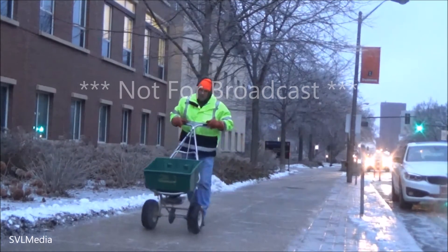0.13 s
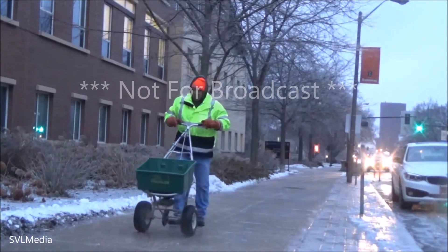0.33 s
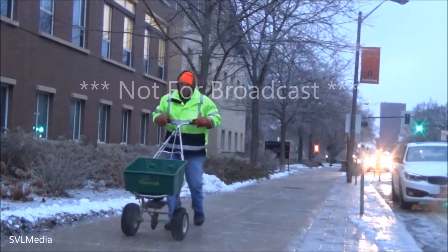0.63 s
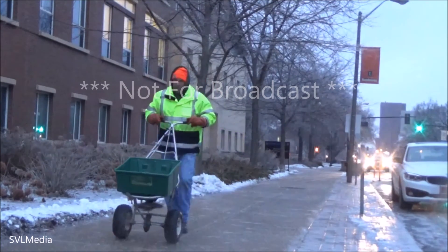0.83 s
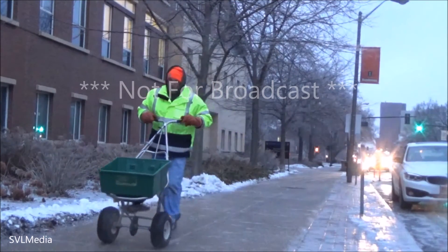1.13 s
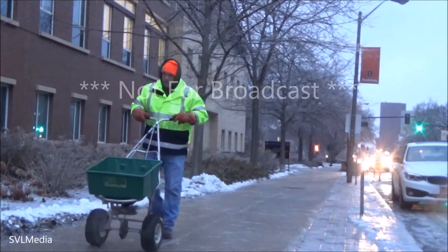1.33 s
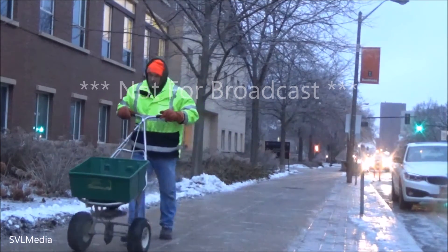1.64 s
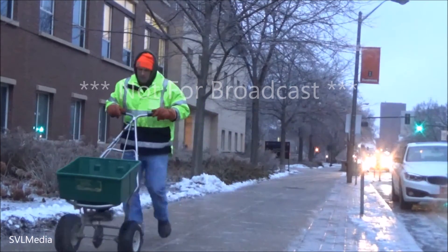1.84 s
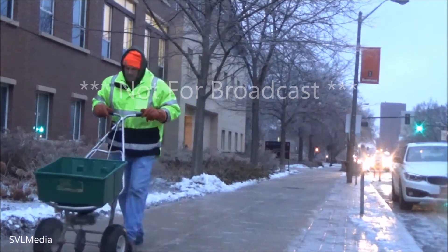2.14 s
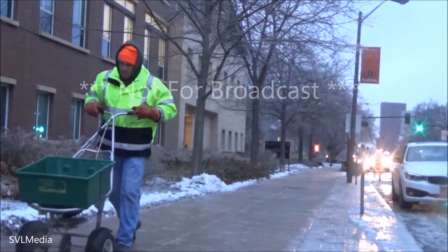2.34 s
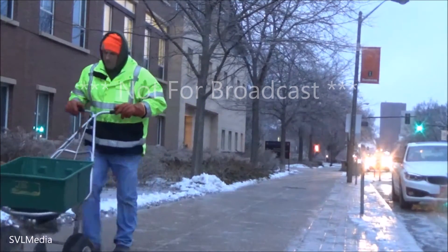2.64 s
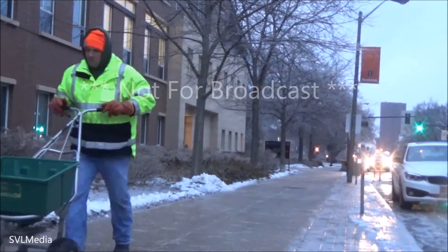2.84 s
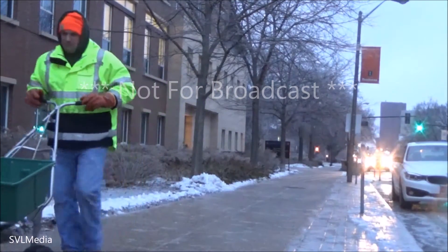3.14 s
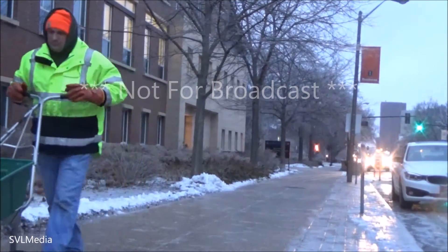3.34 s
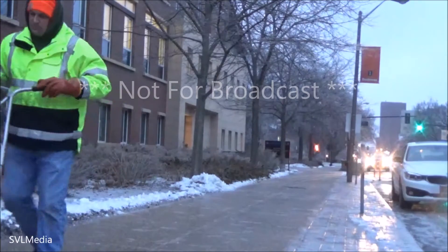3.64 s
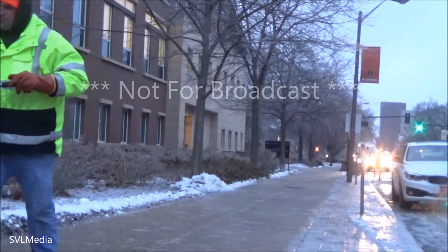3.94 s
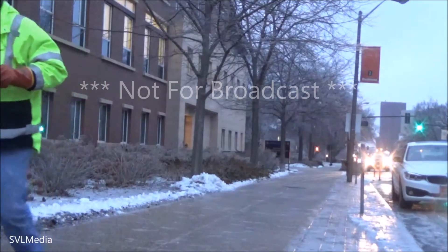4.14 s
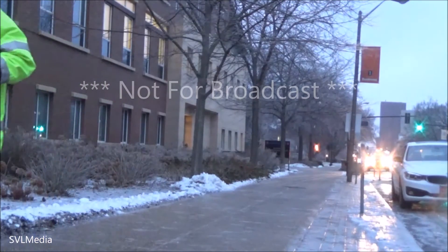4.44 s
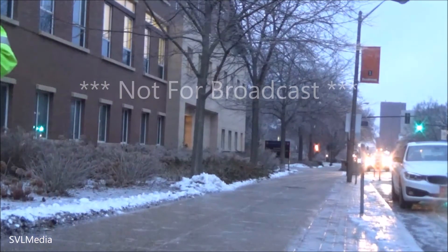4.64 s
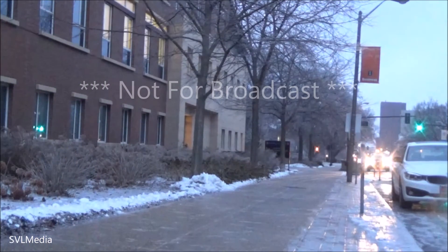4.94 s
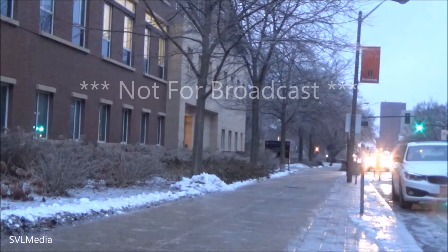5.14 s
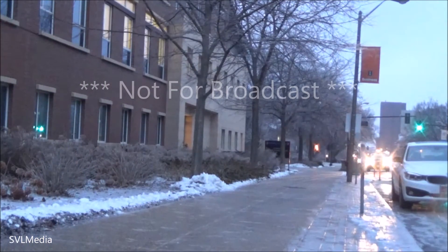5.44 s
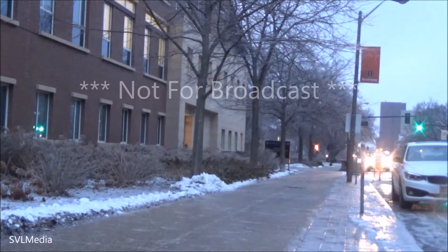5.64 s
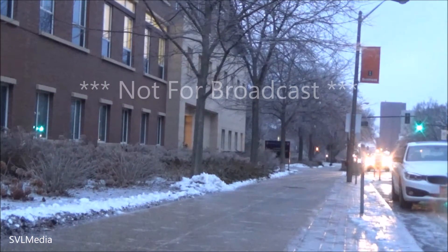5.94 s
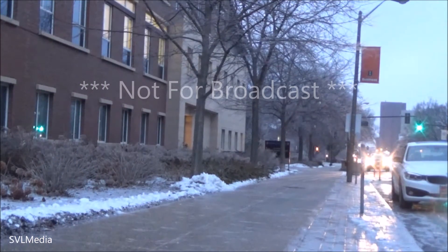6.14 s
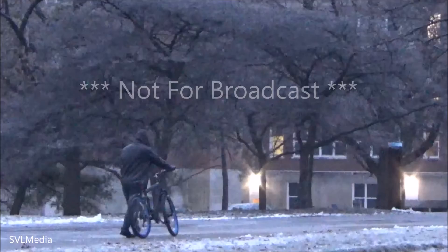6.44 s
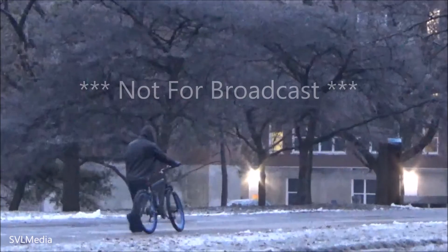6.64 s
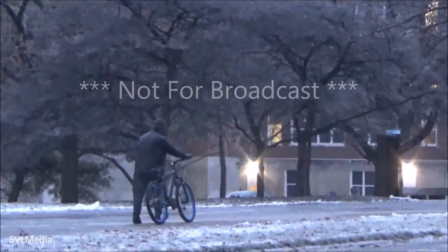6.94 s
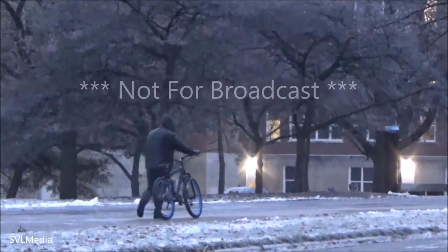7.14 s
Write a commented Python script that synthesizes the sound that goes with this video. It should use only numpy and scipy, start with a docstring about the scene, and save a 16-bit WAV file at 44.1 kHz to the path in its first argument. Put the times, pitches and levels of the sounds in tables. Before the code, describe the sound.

Rock salt sprays and patters from a pushed spreader, passing close on the left in buffeting wind, cuts off, then a quieter spot with icy clicks.

```python
"""On an icy sidewalk a walk-behind spreader flings rock salt, comes close and passes on the left.
Grains patter as random impacts in uneven throws, over a hiss; coarse crystals crack as brief damped cycles.
The spinner rings through narrow resonances; filtered noise makes the buffeting wind and the far traffic.
The sound cuts off; after a short silence a quieter spot follows: wind, clicks of ice, two light clacks."""
import sys
import numpy as np
from scipy import signal
from scipy.fft import rfft, irfft
from scipy.io import wavfile
from scipy.ndimage import uniform_filter1d

SR = 44100
rng = np.random.default_rng(int(sys.argv[2]) if len(sys.argv) > 2 else 0)


def wrap_up_sound(samples):
    """Save the sound to the file named by the first command line argument, as 16-bit audio."""
    columns = np.atleast_2d(samples).T
    # keep every value between -1 and 1, then stretch to whole-number steps
    tamed = np.clip(columns, -1, 1)
    steps = np.round(tamed * 32767).astype(np.int16)
    wavfile.write(sys.argv[1], SR, steps)


N = 320780
T = np.arange(N) / SR  # time in s
CUT_S, RESUME_S = 6.333, 6.476  # end of the first place, start of the quiet spot


def gain_of(db):
    """Level law: decibels to amplitude ratio."""
    return 10 ** (np.asarray(db) / 20)


def evened(x):
    """Normalisation: equal mean power, rms 1."""
    return x / np.sqrt(np.mean(x ** 2) + 1e-20)


def read(points, hz):
    """Spectral interpolation: values lie on a logarithmic frequency axis."""
    f, value = np.transpose(points)
    return np.interp(np.log(hz + 1), np.log(abs(f) + 1), value)


def curve(rows, t):
    """Linear interpolation: a course in time is read at the times t."""
    return np.interp(t, *np.transpose(rows))


def add(mix, s, sound):
    """Superposition: a stereo sound joins the mix at time s."""
    part = mix[:, max(round(s * SR), 0):][:, :sound.shape[1]]
    part += sound[:, :part.shape[1]]


def coloured(x, points):
    """Linear filtering: the spectrum is multiplied by a magnitude response."""
    hz = np.fft.rfftfreq(x.shape[-1], 1 / SR)
    return irfft(rfft(x) * gain_of(read(points, hz)), x.shape[-1])


def wander(hz):
    """Low-pass random process: slow chance of rms 1, up to about hz changes a second."""
    slow = T[::32]
    f = np.fft.rfftfreq(len(slow), slow[1])
    noise = rfft(rng.standard_normal(len(slow)))
    return np.interp(T, slow, evened(irfft(noise / (1 + (f / hz) ** 2), len(slow))))


def pair(z, same):
    """Interaural correlation: two unrelated fields become left and right with a given likeness."""
    same = np.clip(same, -.99, .99)
    mid, side = np.sqrt(1 + same) * z[0], np.sqrt(1 - same) * z[1]
    return np.array([mid + side, mid - side])


def leaning(lean_db):
    """Level difference: gains of left and right, lean_db apart."""
    return gain_of(np.array([[lean_db], [-lean_db]]) / 2)


def tick(hz, cycles, size=512):
    """Damped oscillation: quickly dying cycles, strongest after the given number of them."""
    t = np.arange(size) / SR
    u = t * hz / cycles
    return u * np.exp(1 - u) * np.sin(2 * np.pi * (hz * t + rng.random()))


def splinter(decay_s, size=512):
    """Brittle fracture: a tiny noise burst that covers all pitches at once."""
    return rng.standard_normal(size) * np.exp(-np.arange(size) / SR / decay_s)


def ringing(x, hz, width_hz):
    """Resonance: a doubled pole gives steep flanks."""
    pole = np.exp((2j * np.pi * hz - np.pi * abs(width_hz)) / SR)
    return signal.lfilter([1], np.poly([pole, pole]), x).real


# Relative spectrum of distant traffic and open air: f/Hz, density/dB per Hz
STREET = [(15, -5), (31, -14.5), (45, -4), (75, -7), (180, -28.5), (400, -18), (800, -20.5), (1500, -29.5),
          (3500, -34), (7500, -38.5), (10500, -37)]
# Idling engines: f/Hz, mean level/dB
ENGINES = [(31, -48.5), (91.5, -51.5), (264, -47.5)]


def street(air_db, quiet_spot_db):
    """Broadband and tonal superposition: far traffic and, at the first place, wavering idle drones."""
    air = gain_of(air_db) * evened(coloured(pair(rng.standard_normal((2, N)), same=0.53), STREET))
    drone = np.zeros(N)
    for hz, db in ENGINES:
        phase = 2 * np.pi * np.cumsum(hz + 1.29 * wander(hz=6.8)) / SR
        drone += gain_of(db + 4.0 * wander(hz=15.0)) * np.sin(phase)
    return np.where(T < CUT_S, air + drone, gain_of(quiet_spot_db) * air)


# Light breeze between the gusts: t/s, level/dB
BREEZE = [(0, -23.5), (0.45, -24.5), (1.12, -25.5), (1.24, -30.5), (1.9, -31.5), (2.2, -39), (2.9, -32),
          (4.7, -32.5), (6.2, -29), (6.72, -28), (7.15, -37.5)]
# Gusts on the microphone: start t/s, length/s, level/dB, tilt toward higher eddies/dB per octave
GUSTS = [(0.0, 0.086, -24.5, 4.5), (0.111, 0.058, -24.5, 10.5), (0.621, 0.062, -21, 6),
         (0.701, 0.033, -21.5, 3.5), (0.77, 0.13, -22.5, 4.5), (0.933, 0.055, -22.5, 2),
         (1.024, 0.054, -20.5, 2.5), (1.387, 0.028, -25.5, -3.5), (1.63, 0.21, -35, -7.5),
         (2.553, 0.25, -35, 3), (2.944, 0.016, -22, -0.5), (3.095, 0.054, -27, 2.5), (3.17, 0.14, -31.5, 1),
         (3.504, 0.04, -25.5, 0.5), (3.63, 0.023, -30, -4), (3.817, 0.027, -27.5, 0),
         (4.019, 0.13, -26.5, 1), (4.273, 0.019, -24, 5.5), (4.327, 0.1, -26.5, 6),
         (4.417, 0.04, -21, -0.5), (4.526, 0.03, -27, 1), (4.852, 0.11, -26, 5.5),
         (4.971, 0.016, -23.5, -7), (5.051, 0.026, -25.5, 3.5), (5.103, 0.031, -22, 4),
         (5.244, 0.032, -24.5, -1), (5.6, 0.067, -27, 5.5), (5.736, 0.047, -24.5, 3.5),
         (5.91, 0.028, -23, 1), (5.943, 0.094, -27.5, -3), (6.096, 0.066, -22, -0.5),
         (6.471, 0.045, -24, 2), (6.539, 0.029, -19, -1), (6.683, 0.037, -26, -8), (6.776, 0.05, -26, 1.5),
         (6.818, 0.054, -20.5, -2), (6.881, 0.049, -23, 3), (6.932, 0.045, -23, -1.5),
         (7.054, 0.019, -27.5, 1.5), (7.234, 0.02, -24, -3)]
GUST_RISE_S, GUST_FALL_S = 0.0098, 0.022


def wind_strength():
    """Power addition: gusts rise, hold and fall on the breeze; level (dB), tilt (dB per octave)."""
    power, tilted = gain_of(curve(BREEZE, T)) ** 2, np.zeros(N)
    for start, length, db, tilt in GUSTS:
        end = start + length
        shape = np.interp(T, [start - GUST_RISE_S, start, end, end + GUST_FALL_S], [0, 1, 1, 0])
        gust = (gain_of(db) * shape) ** 2
        power, tilted = power + gust, tilted + tilt * gust
    return 10 * np.log10(power), tilted / power


# Relative spectrum of the buffeting before its tilt: f/Hz, density/dB per Hz
BUFFET = [(20, -1), (43, -14.5), (75, 2), (129, 0), (244, -3.5), (340, -7.5), (460, -12.5), (700, -18.5),
          (1000, -27), (1600, -37.5), (3000, -71.5)]
# Left-right correlation of the wind: f/Hz, likeness (-1 to 1)
SAME_WIND = [(60, 0.94), (130, 0.51), (260, -0.015), (560, -0.31), (1200, -0.12)]


def wind(breeze_tilt_db, lump_db):
    """Turbulent pressure: eddies buffet each port in lumps; quicker eddies reach higher in pitch."""
    level_db, tilt_db = wind_strength()
    hz, t, z = signal.stft(rng.standard_normal((2, N)), SR, nperseg=1024)
    octaves = np.log2(np.clip(hz, 70, 450) / 150)[:, None]
    tilt = np.interp(t, T, tilt_db) + breeze_tilt_db
    colour = gain_of(read(BUFFET, hz)[:, None] + octaves * tilt)
    # each moment's colour has unit power, so that level_db alone sets the strength
    z = pair(z, read(SAME_WIND, hz)[:, None]) * colour / np.linalg.norm(colour, axis=0)
    lumps = gain_of(lump_db * np.tanh(wander(hz=45.0)))
    return evened(signal.istft(z, SR, nperseg=1024)[1][:, :N] * lumps) * gain_of(level_db)


# Single eddies that thump the microphone: t/s, peak level before the mix gain/dB, f/Hz
THUMPS = [(0.011, -9, 108), (0.16, -8, 170), (1.264, -17, 146), (1.406, -17, 137), (2.965, -15, 134),
          (3.536, -10, 145), (5.112, -22, 260), (6.486, -5, 218), (6.562, -9, 154), (6.656, -10, 168),
          (6.834, -10.5, 126), (7.059, -19, 170)]


def thumps(cycles, stray):
    """Pressure transient: a single eddy shoves both ports, each a little differently."""
    out = np.zeros((2, N))
    for s, db, hz in THUMPS:
        shove = tick(hz, cycles, size=3000)
        own = stray * tick(hz, cycles, size=3000)
        add(out, s - cycles / hz, gain_of(db) * np.array([shove + own, shove - own]))
    return out


# Clicks of ice at the quiet spot: t/s, level before the envelope/dB, 60 dB decay time/s
ICE = [(6.505, -28, 0.021), (6.796, -24, .01), (7.0962, -14.5, 0.0089), (7.1046, -21.5, 0.0081)]
# Relative response of the ice: f/Hz, level/dB
ICE_COLOUR = [(1200, -12), (2200, -6), (4500, -8), (7000, -1), (8800, -3), (10500, 0.5)]


def ice():
    """Exponential decay: brittle ice gives a few short, bright clicks."""
    out, t = np.zeros((2, N)), np.arange(4096) / SR
    for s, db, t60 in ICE:
        burst = evened(coloured(pair(rng.standard_normal((2, len(t))), same=0.6), ICE_COLOUR))
        attack = 1 - np.exp(-12 * t / t60)
        add(out, s, burst * gain_of(db - 60 * t / t60) * attack)
    return out


# Light metallic clacks at the quiet spot: t/s, peak level before the lean/dB
CLACKS = [(6.806, -27), (7.153, -29.5)]
# Resonances of the loose part: f/Hz, width/Hz, relative level/dB
CLACK_MODES = [(2390, 110, -2.5), (2980, 1200, 1.5), (4550, 850, -1.5), (5700, 680, -0.5), (9000, 670, -2),
               (9900, 1200, -7.5)]


def clacks(rattle_s, lean_db):
    """Modal excitation: a loose part, likely on a bicycle wheeled past, rattles briefly and rings."""
    out, t = np.zeros((2, N)), np.arange(4096) / SR
    for s, db in CLACKS:
        envelope = t / rattle_s * np.exp(-t / rattle_s)
        rattle = pair(rng.standard_normal((2, len(t))), same=0.6) * envelope
        ring = sum(gain_of(mode_db) * evened(ringing(rattle, hz, width))
                   for hz, width, mode_db in CLACK_MODES)
        add(out, s, gain_of(db) * ring / abs(ring).max())
    return out * leaning(lean_db)


# Boots and wheels crunching over salt and ice:
# t/s, level before the envelope/dB, f/Hz, length/s, width as a share of f
CRUNCHES = [(1.254, -31, 1250, 0.053, .8), (1.647, -30.5, 2350, 0.082, 0.61),
            (2.886, -23, 1790, 0.011, 0.73), (5.127, -29, 555, 0.048, 0.78),
            (5.173, -28.5, 1330, 0.041, 0.32), (5.189, -36, 1260, 0.025, .35)]


def crunches(grains_per_s):
    """Random impulse train: crushed grains crackle dully in a cluster that starts quickly and fades."""
    out = np.zeros((2, N))
    for s, db, hz, length, width in CRUNCHES:
        u = np.linspace(0, 1, int(length * SR))
        breaking = rng.random(len(u)) < grains_per_s / SR
        crackle = rng.standard_normal((2, len(u))) * breaking
        rasp = evened(ringing(pair(crackle, same=0.7), hz, width * hz))
        add(out, s, gain_of(db) * rasp * np.sin(np.pi * np.sqrt(u)))
    return out


# Hard grains snapping on the pavement close by: t/s, peak level before the side gains/dB
SNAPS = [(0.063, -9), (0.2428, -5.5), (0.3796, -9), (0.4112, -6), (0.4501, -13), (0.5477, -6),
         (0.6854, -11), (0.8285, -10), (0.909, -4), (1.0867, -8), (1.1339, -6), (1.2693, -12),
         (1.2777, -16), (1.2995, -25), (1.721, -2), (1.8458, -14), (2.1976, -19), (2.2317, -6),
         (2.726, -15), (3.79, -19), (3.8772, -7), (3.9669, -13), (4.5944, -15), (4.6867, -8), (5.7004, -17),
         (5.9996, -11)]
# Relative response of a snap: f/Hz, level/dB
SNAP_COLOUR = [(1200, -24), (3500, -12), (5500, -2.5), (9500, 2), (11000, -7), (13000, -40)]


def snaps(decay_s, spread):
    """Amplitude panning: a hard grain shatters brightly, a little to one side or the other."""
    out = np.zeros((2, N))
    for s, db in SNAPS:
        snap = coloured(np.pad(splinter(decay_s), 64), SNAP_COLOUR)
        side = spread * rng.uniform(-1, 1)
        sound = np.outer([1 + side, 1 - side], snap / abs(snap).max())
        add(out, s - abs(snap).argmax() / SR, gain_of(db) * sound)
    return out


# The spreader's approach and passing: t/s, level of the salt/dB
SPRAY = [(0, -27), (1.05, -24), (1.5, -23.5), (1.9, -22.5), (2.22, -20), (2.38, -21), (3.05, -20.5),
         (3.88, -21.5), (4.02, -22), (5.65, -24), (6.3, -24)]
# When it is ahead, close, still close, passed, leaving, behind: t/s
PLACES_S = [.7, 2.1, 3.6, 4.8, 5.4, 6.1]
# Smaller crystals: rate, level above the salt's, and pitch; each spread is to either side
LESSER_PER_S, LESSER_DB, LESSER_SPREAD_DB = 5, 1, 1.5
LESSER_HZ, LESSER_OCTAVES, LESSER_CYCLES = 2250, 0.62, 0.67


def lesser_cracks(count=30):
    """Poisson process: smaller crystals land until it has passed, following the salt's level."""
    gap, size, pitch = rng.random((count, 3)).T
    times = np.cumsum(-np.log(gap)) / LESSER_PER_S
    levels = curve(SPRAY, times) + LESSER_DB + LESSER_SPREAD_DB * (2 * size - 1)
    pitches = LESSER_HZ * 2 ** (LESSER_OCTAVES * (2 * pitch - 1))
    return [(s, db, hz, LESSER_CYCLES) for s, db, hz in zip(times, levels, pitches) if s < PLACES_S[3]]


# The loudest coarse crystals cracking on the spreader and the ice:
# t/s, peak level before colour and lean/dB, f/Hz, ring/cycles
CRACKS = [(0.0903, -10, 3150, 0.38), (0.0974, -8.5, 3100, 0.24), (0.243, -17.5, 2520, 0.62),
          (0.411, -14, 2870, .5), (0.528, -15.5, 2700, 0.55), (0.7638, -9.5, 2180, 0.46),
          (1.047, -6.5, 2780, 0.25), (1.2581, -7.5, 1600, 0.29), (1.2598, -18, 660, 0.4),
          (1.2687, -17, 1110, 0.34), (1.2753, -11, 2100, 0.29), (1.349, -14.5, 1880, 0.41),
          (1.3925, -17, 2800, 0.45), (1.481, -17.5, 2200, 0.5), (1.5795, -19, 2400, 0.46),
          (1.655, -13.5, 2250, 0.45), (1.6605, -12.5, 1714, 0.23), (1.6663, -8, 2050, 0.48),
          (1.6684, -10, 4400, 0.67), (1.687, -18, 1910, 0.27), (1.688, -10, 2850, 1),
          (1.7078, -15, 2600, 0.45), (2.054, -12, 1800, 0.4), (2.1504, -14, 1980, 0.34),
          (2.16, -5.5, 2300, 0.41), (2.194, -14.5, 2660, 0.67), (2.3, -9, 1740, 0.29),
          (2.4228, -8, 1900, 0.37), (2.5047, -8, 2900, 0.98), (2.5984, -8, 2770, 0.54),
          (2.843, -17, 1950, 0.49), (2.892, -17, 2200, 0.45), (3.112, -10, 2790, 0.65),
          (3.2352, -9.5, 2900, 0.5), (3.254, -12.5, 2100, 0.38), (3.2814, -10, 2800, 0.6),
          (3.3162, -6.5, 2900, 0.39), (3.6405, -8, 2240, 0.41), (3.6897, -14, 1980, 0.53),
          (4.13, -18, 3350, 1), (4.17, -9, 2500, 0.24), (4.321, -10.5, 3300, 0.63),
          (4.3453, -12.5, 1790, 0.56), (5.126, -15, 1850, 0.69), (5.1837, -16, 1346, 0.7)]
# Relative response of the cracks: f/Hz, level/dB
CRACK_COLOUR = [(300, -25), (750, -0.5), (1300, 1), (3200, -0.5), (4800, 4.5), (8000, -6)]


def cracks(lean_db):
    """Impact excitation: a coarse crystal snaps, dry or with a short ping."""
    out = np.zeros((2, N))
    for s, db, hz, cycles in CRACKS + lesser_cracks():
        snap = gain_of(db) * tick(hz, cycles)
        add(out, s - cycles / hz, np.array([snap, snap]))
    return coloured(out, CRACK_COLOUR) * leaning(lean_db)


# Pinging of the spinner before mode levels and lean: t/s, level/dB
RING = [(3.0, -58), (5.38, -60), (5.5, -42), (6.0, -46.5), (6.3, -42.5)]
# Resonances of the spinner: f/Hz, width/Hz, relative level/dB
SPINNER_MODES = [(1677, 99, -5.5), (1987, 110, 3), (3720, 220, -10)]


def spinner(per_s, struck_s, uneven, burst, between, lean_db, vary_db, waver):
    """Periodic excitation: a rattle of salt about once a turn, one near struck_s, rings the spinner."""
    turns = per_s * (T - struck_s) + uneven * wander(hz=4.5)
    strength = (between + np.exp(-(turns % 1) / burst)) * gain_of(vary_db * wander(hz=12))
    rattle = pair(rng.standard_normal((2, N)), same=0.65) * strength
    ring = sum(gain_of(db) * evened(ringing(rattle, hz, width)) for hz, width, db in SPINNER_MODES)
    bent = T + waver * wander(hz=8.2) / (2 * np.pi * per_s)  # the pitch wavers
    ring = np.array([np.interp(bent, T, side) for side in ring])
    return ring * gain_of(curve(RING, T)) * leaning(lean_db)


def patter(grains, per_s, spread_db, largest):
    """Shot noise: grains land at random times and directions, most tiny; gives two unrelated fields."""
    out = np.zeros((2, N))
    for grain in grains:
        at, size, chance, angle = rng.random((4, 3000))
        lands = chance < per_s * T[-1] / len(grains) / len(at)
        size = gain_of(spread_db * np.minimum(-np.log(size), largest)) * lands
        hits = [np.bincount((at * N).astype(int), size * share(2 * np.pi * angle), N)
                for share in (np.cos, np.sin)]
        out += signal.oaconvolve(np.array(hits), evened(grain)[None], axes=1)[:, :N]
    return evened(out)


def falling_salt(cycles, break_s, breaking_db, count=32):
    """Impact and fracture: some grains ping at a pitch of their own, others splinter with a dry click."""
    pitches = np.linspace(1100, 11500, count)  # Hz
    pinging = [tick(hz, cycles * np.sqrt(hz / 5000)) for hz in pitches]
    breaking = [splinter(break_s) for _ in range(count)]
    pings = patter(pinging, per_s=6000, spread_db=3.0, largest=3.5)
    breaks = patter(breaking, per_s=1200, spread_db=4.0, largest=2.1)
    return evened(pings + gain_of(breaking_db) * breaks)


# Heavier and thinner handfuls off the spinner: t/s, change of level/dB
HANDFULS = [(1.255, 1.5), (1.81, 2.5), (1.9, 4), (2.235, -6.5), (3.87, 2.5), (3.975, -1.5)]
HANDFUL_S = 0.028  # half-width of a handful


def throws(per_s, drift, throb_db, clump_db):
    """Amplitude modulation: the spinner's vanes fling the salt in uneven handfuls."""
    turns = np.cumsum(per_s * (1 + drift * wander(hz=4.1))) / SR
    surge_db = sum(db * np.exp(-((T - s) / HANDFUL_S) ** 2) for s, db in HANDFULS)
    throb = throb_db * np.cos(2 * np.pi * turns)
    return gain_of(throb + clump_db * wander(hz=62) + surge_db)


def patches(frames, bins, size=9):
    """Smoothed random field: chance of rms 1 that drifts over pitch and time."""
    field = rng.standard_normal((frames, bins))
    for axis in (0, 1, 0, 1):
        field = uniform_filter1d(field, size, axis)
    return evened(field).T


# Relative spectra of the spray from five places along the walk: f/Hz, density/dB per Hz
AHEAD = [(530, -17), (900, -21), (1490, -6.5), (1550, -12), (1950, -9.5), (2190, -8.5), (2820, -2),
         (3480, -5), (4760, -2.5), (6250, -4), (9020, -0.5), (10100, -0.5), (11000, -11.5), (14300, -42.5),
         (22000, -120)]
CLOSE = [(470, -42), (800, -32), (1160, -9.5), (1650, -3), (1940, -1.5), (2370, -5.5), (2790, -1),
         (3970, -2.5), (4890, 0), (6290, 0), (9130, 2.5), (10100, 2), (11000, -7), (14300, -53.5),
         (22000, -120)]
PASSED = [(470, -30), (800, -11), (1040, -17.5), (1280, -9.5), (1370, -11), (2030, -5.5), (2420, -7),
          (3220, -6), (3590, -2), (4010, -6.5), (5700, -3.5), (7250, -6.5), (8200, -3.5), (10300, -2),
          (11000, -5), (14300, -45), (22000, -120)]
LEAVING = [(470, -25), (800, -8), (1150, -10.5), (2000, -5.5), (2700, -8), (3600, -1.5), (4400, -7.5),
           (5750, -2), (7300, -7), (8500, -5), (10300, 0), (11000, -4), (14300, -46), (22000, -120)]
BEHIND = [(470, -25), (800, -9.5), (903, -10), (1150, -13), (1630, -7.5), (1740, -15.5), (1990, -2),
          (2170, -11.5), (2790, -9), (3080, -11), (4680, -10.5), (6220, -5), (7170, -7), (8700, -1.5),
          (9860, -2), (11000, -3.5), (14300, -43.5), (22000, -120)]
# Left-right correlation of the spray, in front and behind: f/Hz, likeness (-1 to 1)
SAME_FRONT = [(1000, 0.55), (3500, 0.87), (6500, 0.95), (9500, 0.84)]
SAME_BEHIND = [(1000, 0.36), (2000, 0.44), (3500, 0.23), (6500, 0.13), (9500, 0.84)]
# Lean of the spray to the left, in front and behind: f/Hz, left-right level difference/dB
LEAN_FRONT = [(1500, -0.5), (3500, -2.5), (6500, 1.6), (9500, 1)]
LEAN_BEHIND = [(900, 7.5), (2000, 5.5), (3800, 9.5), (6500, 1.5), (9500, -2.5)]


def spray(patchy_db):
    """Time-varying filtering: pattering grains change colour and spread to the left in passing."""
    behind = curve([(3.2, 0.18), (4.6, 0.51), (5.7, 0.92)], T)  # t/s, share behind
    grains = falling_salt(cycles=1.15, break_s=0.0003, breaking_db=-3.0)
    # countless small bounces blur into a hiss, more so off the microphone's axis
    bounces = gain_of(-4.0 + 5.8 * behind) * rng.standard_normal((2, N))
    flow = throws(per_s=18, drift=0.181, throb_db=1.0, clump_db=1.0)
    hz, t, z = signal.stft((grains + bounces) * flow, SR, nperseg=512)
    # flatten the average spectrum, so that the tables alone set the colour
    z /= np.sqrt(uniform_filter1d(np.mean(abs(z) ** 2, (0, 2)), 5))[:, None]

    nearness = np.array([np.interp(t, PLACES_S, w) for w in np.eye(len(PLACES_S))])
    spectra = [read(c, hz) for c in (AHEAD, CLOSE, CLOSE, PASSED, LEAVING, BEHIND)]
    colour_db = np.transpose(spectra) @ nearness + patchy_db * patches(len(t), len(hz))
    colour = gain_of(colour_db) / np.linalg.norm(gain_of(colour_db), axis=0)

    turn = np.interp(t, T, behind)
    same = np.outer(read(SAME_FRONT, hz), 1 - turn) + np.outer(read(SAME_BEHIND, hz), turn)
    lean_db = np.outer(read(LEAN_FRONT, hz), 1 - turn) + np.outer(read(LEAN_BEHIND, hz), turn)
    z = pair(z, same) * colour * gain_of(np.array([lean_db, -lean_db]) / 2)
    return evened(signal.istft(z, SR, nperseg=512)[1][:, :N]) * gain_of(curve(SPRAY, T))


def scene():
    """Superposition: street, weather and spreader together; the salt sounds only at the first place."""
    background = street(air_db=-35.5, quiet_spot_db=-5.5) + ice() + clacks(rattle_s=0.0036, lean_db=-3)
    buffeting = wind(breeze_tilt_db=-0.7, lump_db=4.0) + gain_of(-4.5) * thumps(cycles=0.482, stray=0.52)
    coarse = crunches(grains_per_s=1800) + cracks(lean_db=3.0) + snaps(decay_s=0.00014, spread=0.3)
    pinging = spinner(per_s=20.0, struck_s=5.992, uneven=0.11, burst=0.25, between=0.07,
                      lean_db=10.5, vary_db=2.5, waver=0.022)
    salt = (spray(patchy_db=1.0) + pinging) * (T < CUT_S)
    return background + buffeting + coarse + salt


EDGE_HZ = 11130  # upper band limit


def record(dry):
    """Gating and low-pass filtering: silence between the two places, then the band limit."""
    running = uniform_filter1d(((T < CUT_S) | (T > RESUME_S)) * 1., size=200)
    lowpass = signal.firwin(701, EDGE_HZ, window=("kaiser", 8), fs=SR)
    return signal.oaconvolve(dry * running, lowpass[None], "same")


dry = scene()
out = record(dry)
wrap_up_sound(out)
```